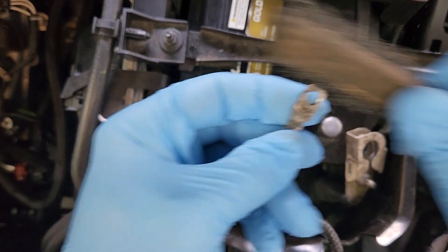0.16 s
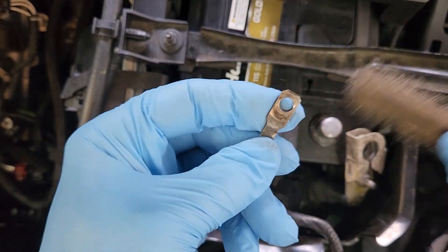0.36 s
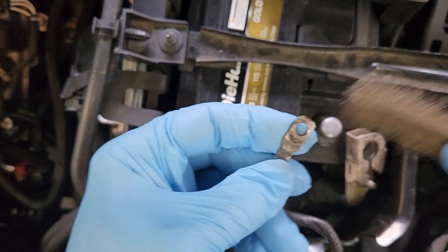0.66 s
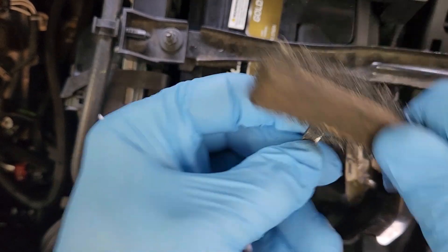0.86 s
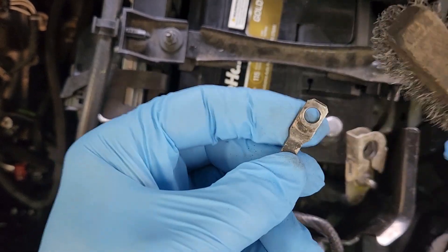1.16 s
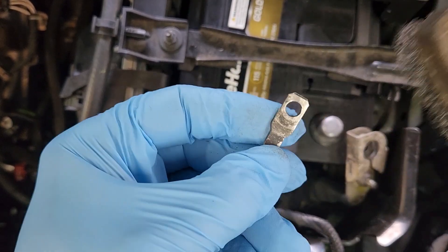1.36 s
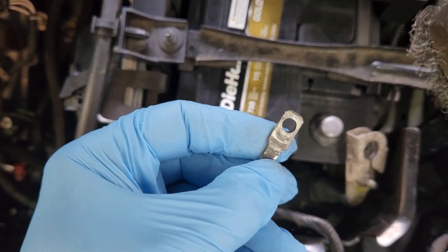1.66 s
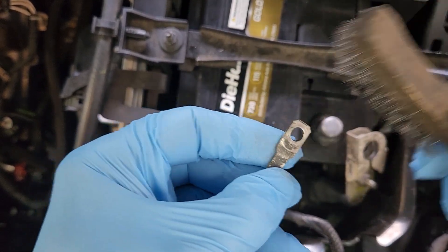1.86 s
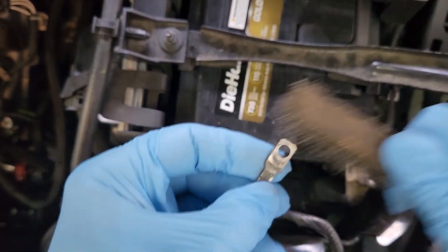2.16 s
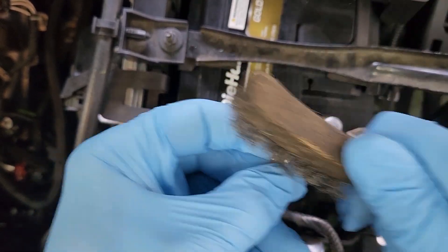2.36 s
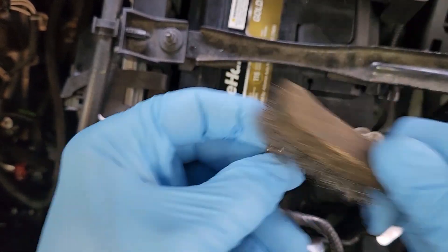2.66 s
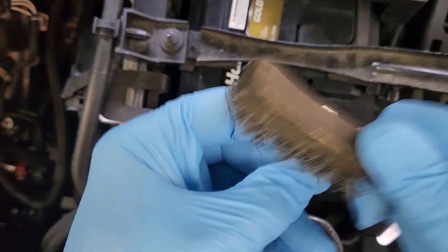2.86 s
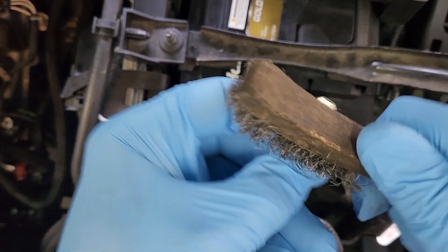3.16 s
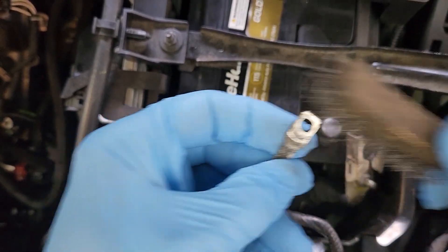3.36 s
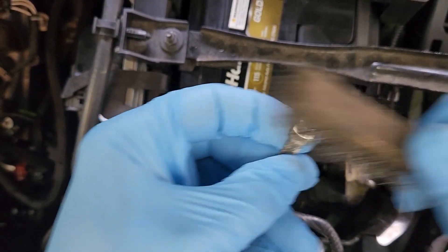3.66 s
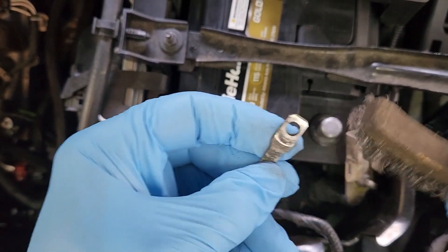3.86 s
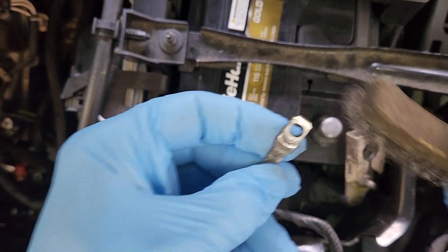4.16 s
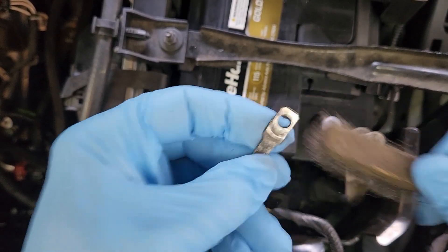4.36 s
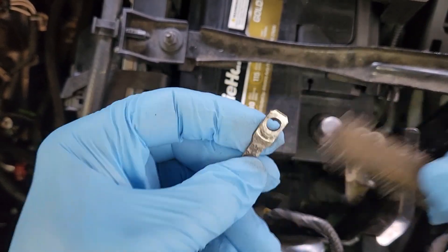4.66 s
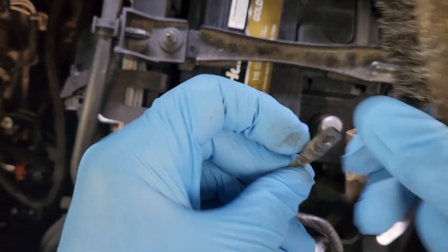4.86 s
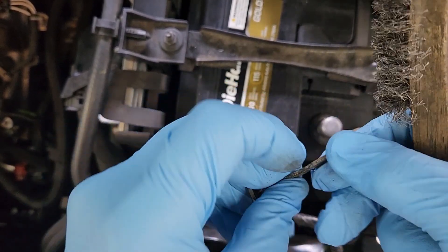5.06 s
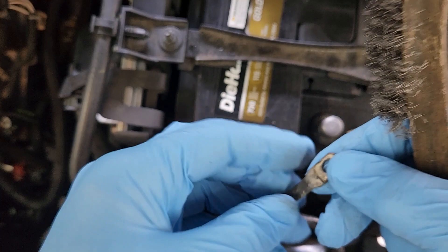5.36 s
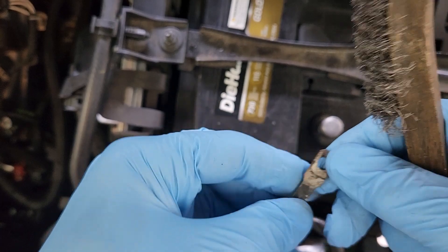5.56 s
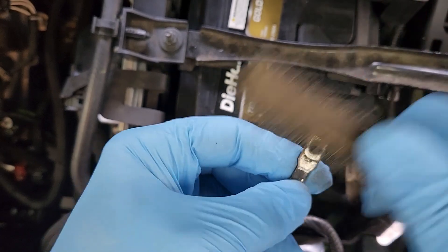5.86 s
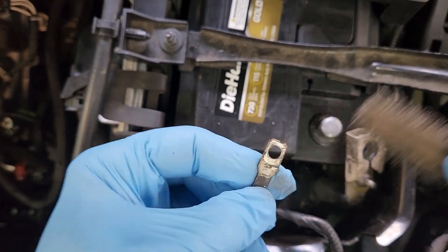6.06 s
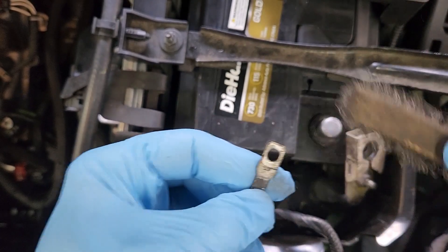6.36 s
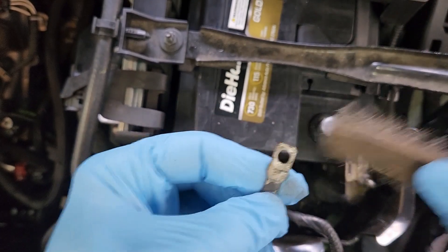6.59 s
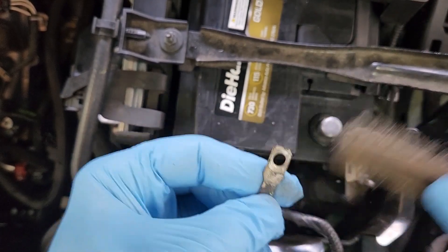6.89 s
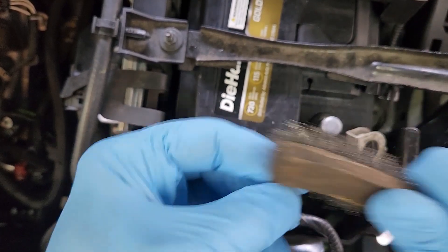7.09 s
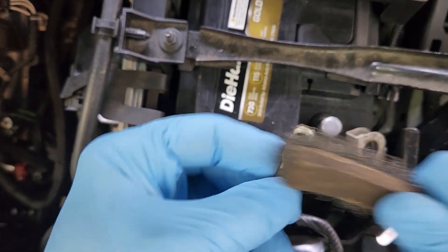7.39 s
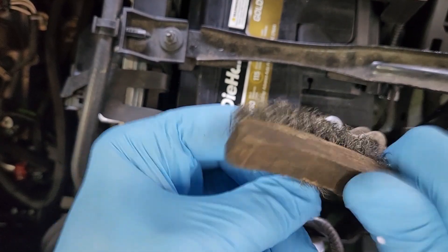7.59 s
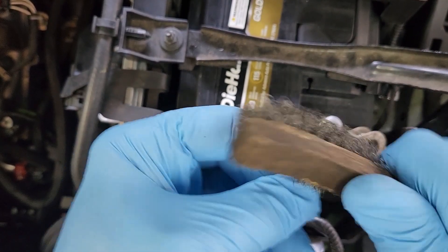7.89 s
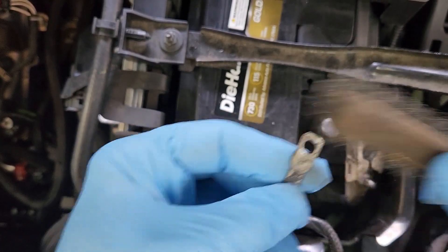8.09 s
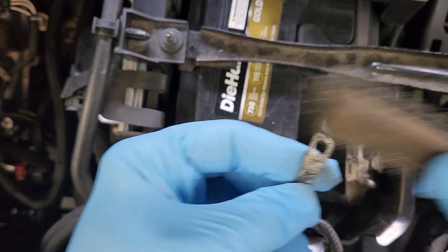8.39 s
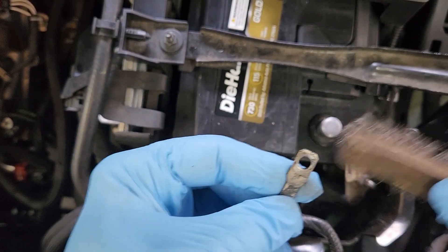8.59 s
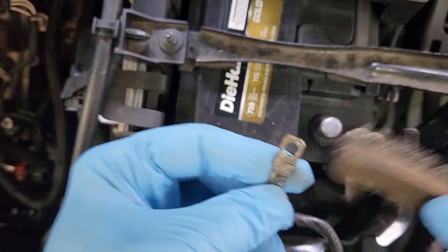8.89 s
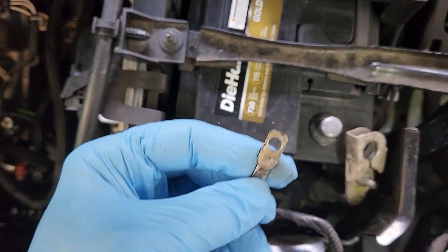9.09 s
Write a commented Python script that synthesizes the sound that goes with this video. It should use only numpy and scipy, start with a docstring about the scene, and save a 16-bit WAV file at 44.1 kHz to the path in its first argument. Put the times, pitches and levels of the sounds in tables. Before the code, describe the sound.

Very close in a garage, a wire brush scrubs a small metal clamp in short, regular, bright strokes, bristles snapping and ringing. A vehicle rumbles away outside at first. After a pause with ticks and glove crackle, the scrubbing resumes duller and quieter, over low traffic drone. The close stereo pickup favours the left, with a light room tail.

```python
"""In a garage, over an engine bay, gloved fingers hold a metal battery terminal close to a phone.
A small wire brush scrubs it: force-driven clicks and slipping tufts excite the ring of the wires.
In each stroke the wires graze, bite, then snap off the edge one by one; gloves crackle in the pause.
Outside, a vehicle rumbles away and leaves a low drone of traffic, all coloured noise and one tone;
faint airy whirs, narrow bands of noise, come and go."""
import sys
import numpy as np
from scipy import signal
from scipy.fft import rfft, irfft
from scipy.io import wavfile
from scipy.ndimage import uniform_filter1d

SR = 44100
rng = np.random.default_rng(int(sys.argv[2]) if len(sys.argv) > 2 else 0)


def wrap_up_sound(samples):
    """Save the sound to the file named by the first command line argument, as 16-bit audio."""
    columns = np.atleast_2d(samples).T
    # keep every value between -1 and 1, then stretch to whole-number steps
    tamed = np.clip(columns, -1, 1)
    steps = np.round(tamed * 32767).astype(np.int16)
    wavfile.write(sys.argv[1], SR, steps)


N = 407484
T = np.arange(N) / SR


def undb(db):
    """Logarithmic level: decibels become an amplitude gain."""
    return 10 ** (np.asarray(db) / 20)


def unit(x):
    """Energy normalisation: scale a response to unit energy."""
    return x / np.sqrt(np.sum(x ** 2))


def add(track, s, sound):
    """Superposition: mix a short sound in at time s."""
    i = max(int(s * SR), 0)
    track[i:i + len(sound)] += sound[:max(N - i, 0)]


def through(x, response):
    """Convolution: pass a sound through an impulse response."""
    return signal.oaconvolve(x, response)[:len(x)]


def colour(points, size=1024):
    """Minimum phase: causal impulse response of a (Hz, dB) spectrum, by folding its cepstrum."""
    hz, db = np.transpose(points)
    f = np.maximum(np.arange(size // 2 + 1) * SR / size, 1)
    gain = undb(np.interp(np.log(f), np.log(hz), db))
    cepstrum = irfft(np.log(gain))
    cepstrum[1:size // 2] *= 2
    cepstrum[size // 2 + 1:] = 0
    return irfft(np.exp(rfft(cepstrum)))


def burst(t60):
    """Exponential decay: noise that falls 60 dB in t60 seconds, at unit energy."""
    t = T[:int(t60 * SR) + 2]
    return unit(rng.standard_normal(len(t)) * np.exp(-np.log(1000) * t / t60))


def mode(hz, width, size=2048):
    """Damped resonance: the ring of one mode, its gain near 1 at the centre."""
    t = T[:size]
    decay = np.exp(-np.pi * width * t)
    return 2 * np.pi * width / SR * decay * np.cos(2 * np.pi * hz * t)


def walk(rate):
    """Slow fluctuation: random steps smoothed into a wander with a spread near 1."""
    k = int(SR / rate)
    steps = np.repeat(rng.standard_normal(N // k + 1), k)
    return 1.197 * uniform_filter1d(steps, k)[:N]


def clicks(rate, spread_db):
    """Shot noise: random clicks per second of uneven size and either sign, rms 1."""
    chance, size = rng.random(N), rng.standard_normal(N)
    x = (chance < rate / SR) * np.sign(size) * undb(spread_db * np.minimum(np.abs(size), 2))
    return x / np.sqrt(np.mean(x ** 2))


LAND_S, GRAZE_S, DIG_S, RELEASE_S = .009, .052, .018, .026
# Brush strokes. Each row: bite in seconds, scrub length in seconds,
# contact force in dB at the bite, contact force in dB at the lift.
STROKES = [(0, .031, -19.5, -26), (0.268, .052, -20.5, -29), (.54, .018, -32, -31),
           (.598, .028, -25.5, -25.5), (0.882, .065, -20.5, -23.5), (2.048, .12, -32, -42),
           (2.356, .069, -29.5, -33.5), (2.642, .061, -19, -31.5), (2.912, .065, -19, -37),
           (3.195, .054, -19.5, -23), (3.477, .056, -18.5, -26), (3.749, .056, -17.5, -25.5),
           (4.013, .064, -24.5, -19), (4.298, .053, -20, -24.5), (4.568, .06, -19.5, -26),
           (4.954, .012, -41.5, -37), (5.953, .062, -34, -35), (6.244, .05, -37, -31.5),
           (6.517, .057, -30.5, -33), (6.781, .079, -34, -33), (7.072, .062, -29, -32),
           (7.365, .062, -25.5, -31), (7.637, .065, -28.5, -30.5), (7.925, .076, -28.5, -36.5),
           (8.206, .078, -27.5, -34.5), (8.492, .088, -32.5, -36.5), (8.783, 0.085, -28, -37)]


def phases():
    """Stroke kinematics: touch, bite and lift of every stroke; a mere flick has no long graze."""
    bite, scrub = np.transpose(STROKES)[:2]
    return np.transpose([bite - np.minimum(GRAZE_S, scrub), bite, bite + scrub])


# the graze follows a share of any change of the bite from a firm one, and swells towards the dig
FIRM_DB, GRAZE_DB, GRAZE_FOLLOWS = -15, -44.5, 0.24
MID_GRAZE_DB, GRAZE_SWELL_DB, RELEASE_DB = 2.5, 6, -34
# strokes slower than a brisk one land more softly (dB per doubling of the scrub length)
BRISK_S, SLOW_LANDING_DB = 0.054, -8.5
# How the terminal is held, as the grip shifts. Each row: start in seconds,
# ring of the wires in dB over their scratch, fizz of the tips in dB before its common gain.
GRIPS = [(0, 9.5, -0.5), (.75, 5.5, 1), (4.8, -12, -2), (6.7, -3.5, -10.5)]


def pressure():
    """Contact force, with wire ring and tip fizz: land, graze, dig in to the bite, scrub, release."""
    force = np.zeros(N)
    for (touch, bite, lift), (_, scrub, bite_db, lift_db) in zip(phases(), STROKES):
        graze_db = GRAZE_DB + GRAZE_FOLLOWS * (bite_db - FIRM_DB)
        graze_db += SLOW_LANDING_DB * np.log2(max(scrub / BRISK_S, 1))
        dig = max(bite - DIG_S, touch)
        times = [touch - LAND_S, touch, (touch + dig) / 2, dig, bite, lift, lift + RELEASE_S]
        levels = [-80, graze_db, graze_db + MID_GRAZE_DB, graze_db + GRAZE_SWELL_DB,
                  bite_db, lift_db, lift_db + RELEASE_DB]
        span = slice(*np.searchsorted(T, [times[0], times[-1]]))
        force[span] += undb(np.interp(T[span], times, levels))
    start, ring_db, fizz_db = np.transpose(GRIPS)
    grip = np.searchsorted(start[1:], T)
    return force, undb(ring_db[grip]), undb(fizz_db[grip])


LEAD_IN_S = .003  # short noise that rises into the click


def tuft(hz, chatter_s=.007, chatter_db=1, twang_db=-3, twang_width_hz=600, lead_in_db=-6):
    """Stick-slip release: a tuft clicks free, its wires chatter and twang briefly at hz."""
    snap = undb(chatter_db) * burst(chatter_s)
    snap[0] += 1
    # a noise decay turned backwards rises into the click
    lead_in = undb(lead_in_db) * burst(2 * LEAD_IN_S)[:int(LEAD_IN_S * SR)][::-1]
    body = undb(twang_db) * unit(mode(hz, twang_width_hz, size=384))
    body[0] += 1
    return unit(np.convolve(np.r_[lead_in, snap], body))


def slips(force, rate, spread_db, bite_hz=5100, lift_hz=2400, scatter_octaves=1.0):
    """Stick-slip: tufts let go unevenly; as the brush slides off, free length grows and pitch falls."""
    x = np.zeros(N)
    draws = rng.random((6000, 4))
    times = np.cumsum(.25 + 1.5 * draws[:, 0]) / rate
    pitch = np.interp(times, phases().ravel(), np.tile([lift_hz, bite_hz, lift_hz], len(STROKES)))
    for s, hz, (_, size, side, length) in zip(times, pitch, draws):
        if s < T[-1] and force[int(s * SR)] > 0:
            scattered_hz = hz * 2 ** (scatter_octaves * (length - .5))
            add(x, s, np.sign(side - .5) * undb(spread_db * size) * tuft(scattered_hz))
    return x / np.sqrt(np.mean(x[force > 0] ** 2))


def drag(force, drag_db=-6, drag_hz=2400, width_hz=550):
    """Sliding friction: lightly pressed wires rasp lower as a stroke lands and as it lifts."""
    bent = np.interp(T, phases().ravel(), np.tile([1, 0, 1], len(STROKES))) ** 2
    rasp = force * bent * clicks(rate=600, spread_db=5.5)
    return undb(drag_db) * through(rasp, unit(mode(drag_hz, width_hz)))


# level is over the driving force, before the gain common to all snaps; both spreads are full widths
SNAPS_PER_S, LESSER_SNAP_DB, SNAP_SPREAD_DB = 65, 16, 4.5
SNAP_HZ, SNAP_SCATTER_OCTAVES = 3780, .25


def lesser_snaps(drive):
    """Driven release: rows (s, dB, Hz) of tufts that snap by chance, as strong as they are driven."""
    draws = rng.random((1500, 3))
    times = np.cumsum(.5 + draws[:, 0]) / SNAPS_PER_S
    rows = []
    for s, (_, size, length) in zip(times, draws):
        if s < T[-1] and drive[int(s * SR)] > 0:
            drive_db = 20 * np.log10(drive[int(s * SR)])
            db = drive_db + LESSER_SNAP_DB + SNAP_SPREAD_DB * (size - .5)
            rows.append((s, db, SNAP_HZ * 2 ** (SNAP_SCATTER_OCTAVES * (length - .5))))
    return rows


# The hardest snaps of wires off the edge. Each row: click in seconds,
# level in dB before the common snap gain, pitch of the tuft in Hz.
SNAPS = [(.263, -4.5, 3370), (.283, 0, 3500), (.549, -7, 3740), (.58, -7.5, 3770), (.617, -10, 3860),
         (.875, -8.5, 3690), (2.053, -10, 3760), (2.089, -16.5, 4180), (2.355, -9.5, 4180),
         (2.38, -11, 3900), (2.397, -5, 3600), (2.627, -8, 3800), (2.65, 0, 4200), (2.659, -1, 3550),
         (2.91, -3.5, 3856), (2.932, 1, 3820), (3.196, -0.5, 3740), (3.226, -5, 3910), (3.474, -7, 3980),
         (3.491, -3.5, 3840), (3.755, 0.5, 4000), (3.787, 2, 4424), (4.041, 2, 4800), (4.3, -2, 3820),
         (4.564, 0, 3987), (4.607, 1.5, 4247), (7.37, -9, 4750), (7.427, -11.5, 3800), (7.92, -9, 5413),
         (8.519, -8.5, 5070)]
# Colour of wire tips scratching. Each row: frequency in Hz, relative level in dB.
SCRATCH = [(240, -34), (400, -19.5), (780, -17), (1010, -19.5), (1600, -8), (2100, -4.5), (2700, -17.5),
           (4380, -2.5), (5600, -5.5), (6440, -5), (7750, -7), (8900, -11), (11800, -9.5), (16000, -9)]
# Resonances of the wires and the terminal. Each row: centre in Hz, width in Hz, relative level in dB.
RING = [(853, 59, -6), (1300, 1200, -23.5), (2780, 590, -5), (3490, 140, 0.5), (3612, 45, 3.5),
        (3865, 470, 3.5), (4322, 310, 7), (4700, 510, -0.5), (5080, 45, -4.5), (5550, 160, -26),
        (5844, 37, -3.5), (6290, 140, 2), (6800, 130, -9), (7230, 45, -14.5), (7480, 670, -8.5)]


def brush(hard_db=-24, scrape_db=-2, slip_db=-2, snap_db=4, fizz_db=-6, aside_db=-3):
    """Friction-driven resonance: light force scrapes finely, hard force makes tufts slip; wires ring.
    Returns the sound sent towards the phone and the scrape of the wires that face aside."""
    force, ring, fizz = pressure()
    hard = np.clip(force / (force + undb(hard_db)) + 0.017, 0, .95)
    fizz = fizz * (hard / .5) ** 0.33  # a mere graze sounds duller

    scrape_gain = undb(scrape_db + 3.3 * walk(160)) * (1 - hard)
    scrape = scrape_gain * clicks(rate=4000, spread_db=5.5)
    slipping = undb(slip_db) * np.sqrt(hard) * slips(force, rate=280, spread_db=15.5)
    front = force * (scrape + slipping) + drag(force * (1 - hard))

    for s, db, hz in SNAPS + lesser_snaps(force * ring / np.hypot(1, ring)):
        snap = tuft(hz, chatter_s=0.0088, chatter_db=0.0, twang_db=-1.5, lead_in_db=-10.5)
        add(front, s - LEAD_IN_S, undb(db + snap_db) * snap)
    aside = undb(aside_db + 2 * walk(200)) * force * clicks(rate=2500, spread_db=2.5)

    scratch = unit(colour(SCRATCH))
    wires = unit(sum(undb(db) * mode(hz, width, size=4096) for hz, width, db in RING))
    tips = unit(colour([(2000, -28), (7000, -10.5), (11500, -4.0), (13300, -12.0), (15000, 0.0)]))
    share = 1 / np.sqrt(1 + ring ** 2)  # what goes into ringing is taken from the scratch
    return [through(x * share, scratch)
            + through(x * share * ring, wires)
            + undb(fizz_db) * through(x * fizz, tips) for x in (front, aside)]


def air(points, db, side_db, alike_below_hz=450):
    """Spatial coherence: stereo noise of a given colour; long waves reach both ports alike."""
    response = unit(colour(points, size=16384))
    mid, side = (through(rng.standard_normal(N), response) for _ in range(2))
    high_pass = signal.butter(1, alike_below_hz, "high", fs=SR, output="sos")
    side = signal.sosfilt(high_pass, side)
    return undb(db) * (mid + undb(side_db) * side * np.array([[1], [-1]]))


# Rumble of traffic. Each row: time in seconds, level in dB before its wander.
TRAFFIC = [(0, -33), (.9, -32), (2, -36), (3.2, -41.5), (4.8, -40.5), (7, -43.5), (9.24, -42.5)]
# Tyre roar of the vehicle that leaves. Each row: time in seconds, level in dB before its wander.
LEAVING = [(0, -43.5), (.6, -44), (1.1, -46.5), (1.6, -50.5), (2.2, -56.5), (3, -64), (4.5, -74),
           (6, -74.5), (9.24, -77)]
# Drone of distant tyres. Each row: time in seconds, level in dB before a common gain and its wander.
DRONE = [(0, -54), (1, -50), (2, -58.5), (3.5, -68), (5, -77), (5.7, -66), (6.7, -65), (7.5, -65.5),
         (8.3, -66), (9.24, -57)]
# Colours of the rumble, the roar and the still background.
# Each row: frequency in Hz, relative level in dB.
RUMBLE = [(13, -38), (22, -6.5), (48, 0), (119, -2), (137, -6), (168, -15.5), (230, -31), (300, -54),
          (510, -120)]
ROAR = [(120, -27), (200, -2), (387, -7), (432, -9), (538, -4.5), (806, -4), (899, -14.5), (1180, -18.5),
        (1450, -15), (4350, -30), (7010, -38), (7680, -44), (8580, -88.5), (10900, -56), (16000, -57.5)]
STILL = [(120, -31.5), (200, -0.5), (400, -7.5), (800, -26), (1000, -18), (1300, -17), (2200, -17),
         (3500, -25), (4500, -23.5), (5600, -30), (7200, -32), (8300, -57), (10500, -51.5), (12000, -41.5),
         (16000, -43.5)]


def traffic(still_db=-64, engine_db=-34, exhaust_db=6):
    """Broadband and tonal sources: rumble and far tyres; the leaving roar, exhaust and engine note."""
    leaving = np.interp(T, *np.transpose(LEAVING))
    rumble_level = np.interp(T, *np.transpose(TRAFFIC)) + 0.92 * walk(12)
    rumble = air(RUMBLE, rumble_level, side_db=-8.5)

    drone_colour = [(120, -33.5), (200, -2.5), (300, 4), (450, -6), (800, -20.5), (2000, -53)]
    drone_level = np.interp(T, *np.transpose(DRONE)) - 1 + 1.5 * walk(9)
    drone = air(drone_colour, drone_level, side_db=-7.5)

    roar = air(ROAR, leaving + walk(9.8), side_db=0.0)
    exhaust_colour = [(40, -30.5), (100, -1), (135, 2.5), (180, -8), (260, -22.5), (500, -67.5)]
    exhaust = air(exhaust_colour, leaving + exhaust_db, side_db=-10)
    still = air(STILL, still_db + .9 * walk(4.5), side_db=0.0)

    # the engine note wavers in pitch and level and fades more slowly than the tyres
    phase = 2 * np.pi * np.cumsum(126 * (1 + 0.0353 * walk(14))) / SR
    engine_level = engine_db + .66 * (leaving - leaving.max()) + 3 * walk(12)
    engine = undb(engine_level) * np.sin(phase)
    return rumble + drone + roar + exhaust + still + engine


# Gloves, brush and terminal being handled. Each row: start in seconds, level in dB of the excitation,
# resonance in Hz, decay time t60 in seconds.
TICKS = [(1.183, -33, 6500, .015), (1.212, -34, 6400, .03), (1.297, -30, 2300, .02),
         (4.746, -25, 2780, 0.064), (4.769, -28.5, 6500, 0.041), (4.824, -22.5, 5460, 0.012),
         (4.851, -25.5, 4700, 0.062), (5.337, -27, 4050, 0.072), (5.37, -16, 4130, 0.017),
         (5.386, -25.5, 2870, 0.041), (5.524, -34, 3000, 0.013), (5.552, -34, 2780, .017),
         (5.588, -29.5, 2520, 0.039), (5.598, -26.5, 4240, 0.043), (5.678, -31, 2800, 0.11),
         (5.704, -30.5, 5540, .036), (5.899, -22.5, 3710, .02), (6.187, -21, 6450, .035),
         (6.463, -23.5, 4500, .03), (8.38, -25.5, 526, .046), (8.416, -17.5, 580, 0.097),
         (8.424, -20.5, 1210, 0.31), (8.427, -36, 4000, .04), (9.15, -34, 6810, .025)]


def handling(crackle_db=-64):
    """Impact excitation: ticks of one resonance each, and glove crackle, strongest at the regrip."""
    out = np.zeros(N)
    skin = unit(colour([(500, -14), (2000, -5.5), (4500, 0.5), (7000, -16.5), (9000, -22),
                        (12000, -17), (16000, -16)]))
    for s, db, hz, t60 in TICKS:
        body = unit(mode(hz, hz / 5))
        body[:len(skin)] += skin * min(hz / 4500, 1)  # dull knocks have little scratch
        knock = np.r_[.6, burst(t60)]
        add(out, s, undb(db) * signal.fftconvolve(knock, body))
    regrip = np.interp(T, [4.68, 4.8, 5.05, 5.3, 5.45, 5.55, 5.72, 5.8],
                       [0.14, 1, 0.41, 0.7, 0.2, 1, 0.86, 0.078])
    crackle = undb(crackle_db + 2.9 * walk(22)) * regrip * clicks(rate=900, spread_db=7)
    rubber = unit(colour([(800, -10.0), (2500, -3.0), (4500, 3.5), (7000, -13), (9000, -23),
                          (16000, -13.5)]))
    return out + through(crackle, rubber)


# Faint airy whirs. Each row: start in seconds, end in seconds, centre in Hz, width in Hz,
# level in dB at the height of the swell, before its wander.
WHIRS = [(5.303, 6.591, 1946, 380, -67), (8.2, 9.7, 1263, 190, -70.5)]


def whirs():
    """Narrow-band noise: far-off bands that swell, waver and fade."""
    out = np.zeros((2, N))
    for start, end, hz, width, db in WHIRS:
        swell = np.sqrt(np.interp(T, [start, (start + end) / 2, end], [0, 1, 0]))
        band = [(hz - 2 * width, -45), (hz - width / 2, -3), (hz, 0),
                (hz + width / 2, -3), (hz + 2 * width, -45)]
        out += swell * air(band, db + 0.53 * walk(3.9), side_db=0)
    return out


ROOM_T60_S, ROOM_DB = 0.45, -21
PORT_LAG_SAMPLES = 13  # the right port hears the near sound later
# How much weaker the near sound is at the right port. Each row: frequency in Hz, gain in dB.
SHADOW = [(300, -11.5), (800, -12.5), (2000, -9.5), (3500, -7.5), (5000, -15), (7500, -21.5), (9500, -18.5),
          (12000, -18), (16000, -15.5)]


def garage(x, aside, bay_t60_s=0.039, left_bay_db=-11, right_bay_db=-5):
    """Precedence and reverberation: left port first; the bay scatters and the garage rings on."""
    bay_delay = np.zeros(PORT_LAG_SAMPLES * 2)
    left = x + undb(left_bay_db) * through(x, np.r_[bay_delay, burst(bay_t60_s)])
    right = x + aside + undb(right_bay_db) * through(x, np.r_[bay_delay, burst(bay_t60_s)])
    right = through(right, np.r_[np.zeros(PORT_LAG_SAMPLES), colour(SHADOW)])
    room = colour([(300, 12.5), (2300, -2), (3800, -8.5), (5200, -8.5), (7000, -2), (9000, -17.5),
                   (12000, -10.5), (16000, -14.0)])
    far = through(x, room)
    tails = [through(far, burst(ROOM_T60_S)) for _ in range(2)]
    return np.array([left, right]) + undb(ROOM_DB) * np.array(tails)


def scene():
    """Superposition: brush and hands in the garage, traffic outside and faint whirs."""
    front, aside = brush()
    return garage(front + handling(), aside) + traffic() + whirs()


def record(dry, top_hz=15800):
    """Port response: the phone's ports swallow a band near 9 kHz; peaks round off, the top is cut."""
    ports = colour([(7400, 0.5), (8300, -4.0), (9300, -6), (10300, -4.5), (11300, 4.5)])
    heard = np.array([through(channel, ports) for channel in dry])
    low_pass = signal.ellip(10, .2, 70, top_hz, fs=SR, output="sos")
    return signal.sosfilt(low_pass, np.tanh(heard))


dry = scene()
out = record(dry)
wrap_up_sound(out)
```